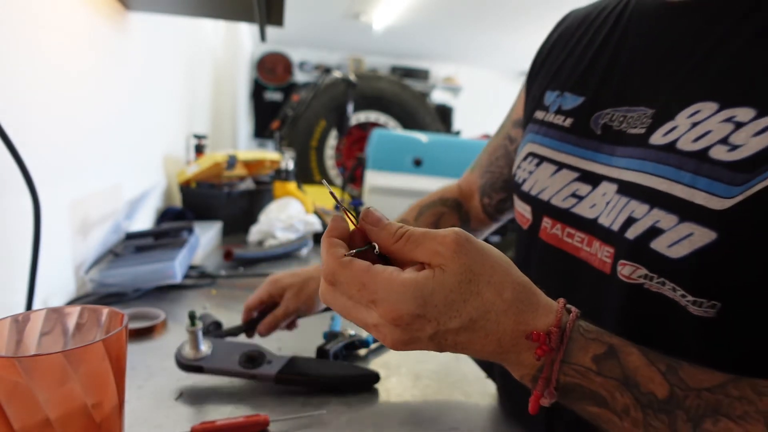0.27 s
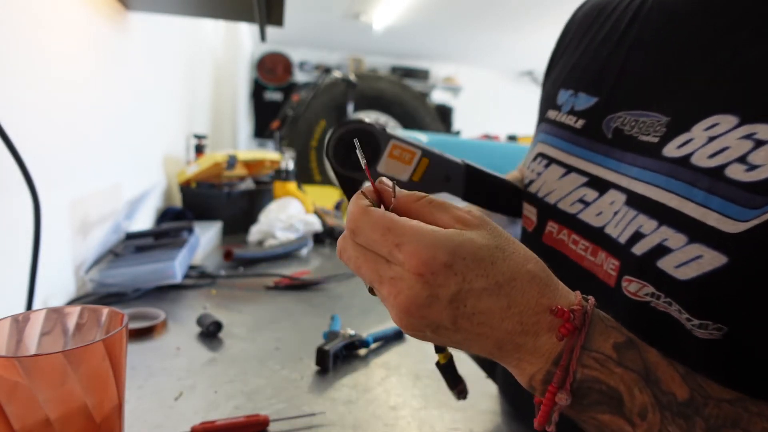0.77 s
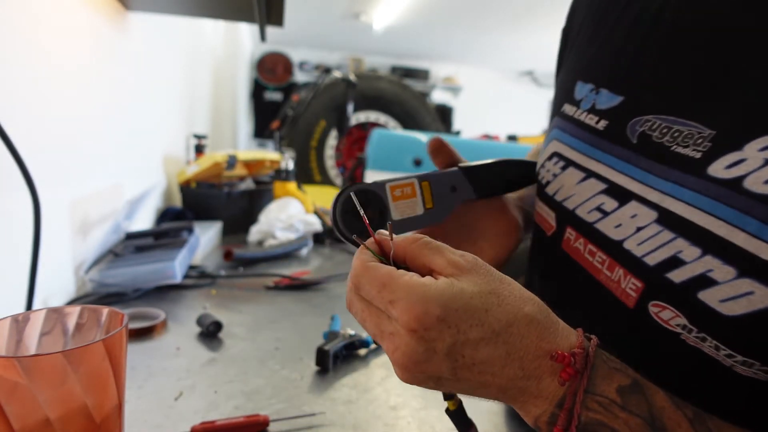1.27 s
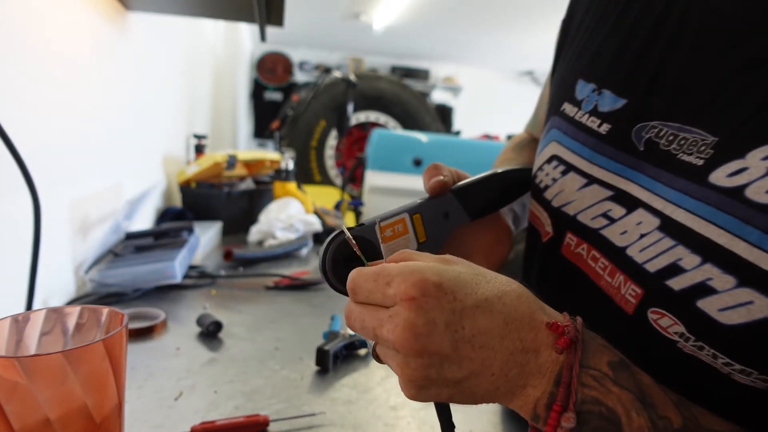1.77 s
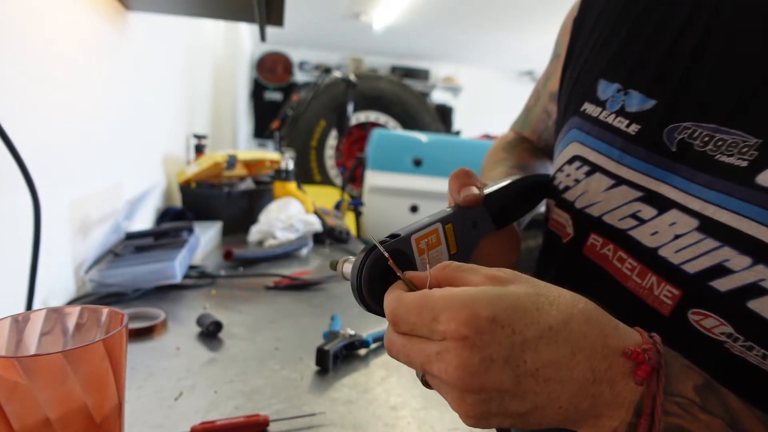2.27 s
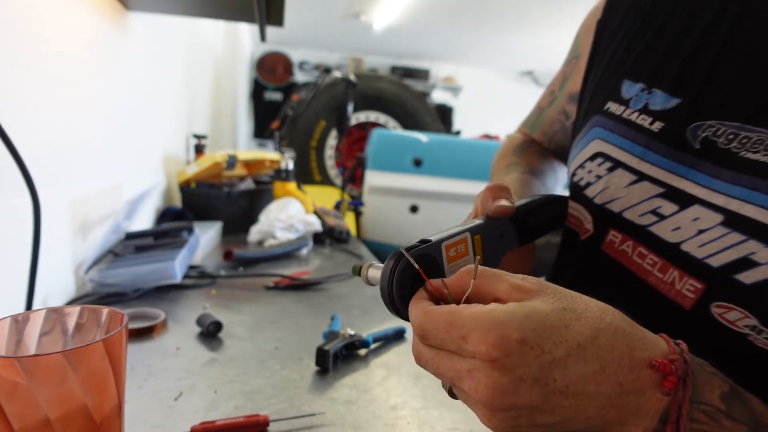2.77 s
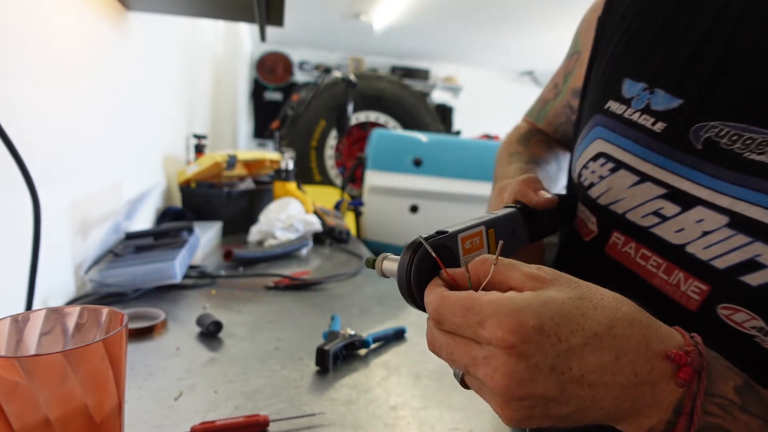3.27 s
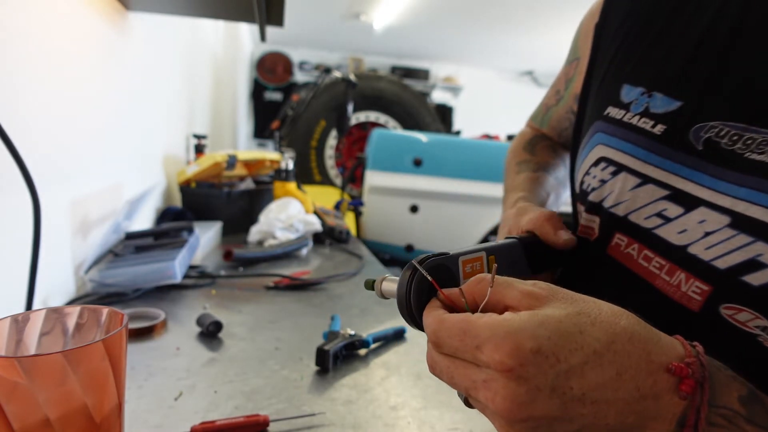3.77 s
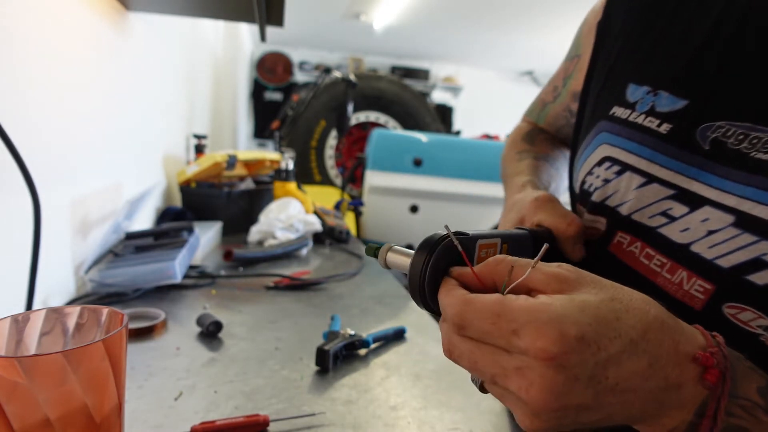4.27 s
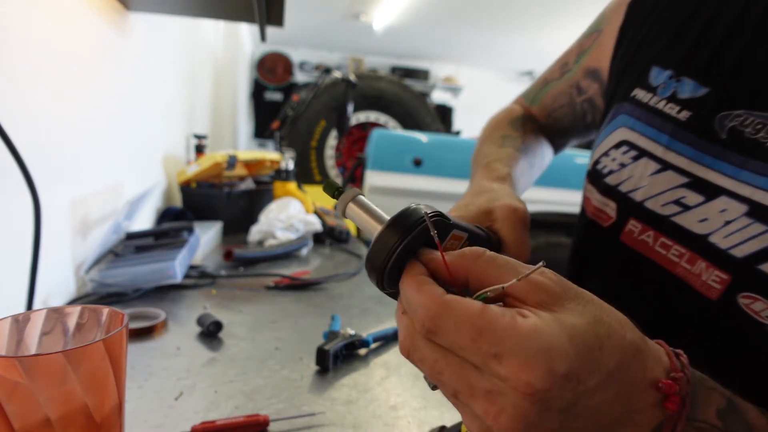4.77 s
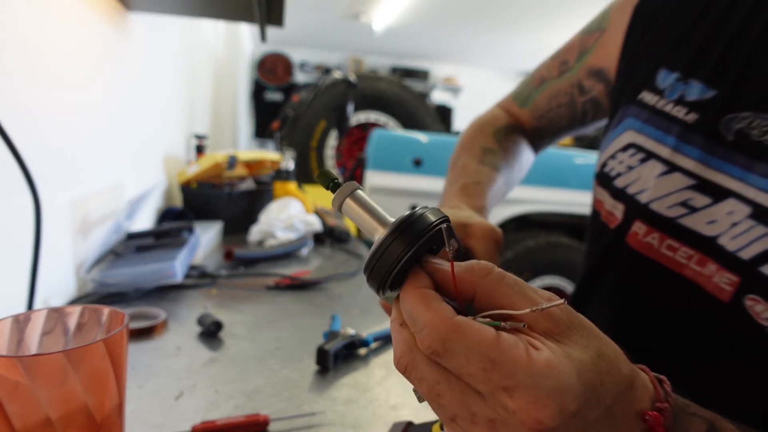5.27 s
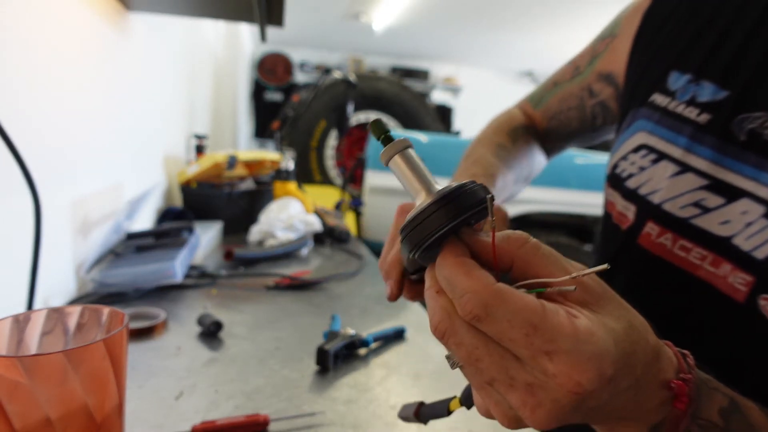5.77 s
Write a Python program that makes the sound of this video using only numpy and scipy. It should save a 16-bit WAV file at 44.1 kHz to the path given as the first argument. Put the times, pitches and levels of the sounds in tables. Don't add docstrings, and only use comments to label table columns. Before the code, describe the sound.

In a quiet garage, a metal hand tool rattles off a steel bench, a catch snaps, sharp ratchet clicks quicken, and jaws spring open with a clatter.

```python
import sys
import numpy as np
from scipy import signal
from scipy.fft import rfft, irfft
from scipy.io import wavfile
from scipy.ndimage import uniform_filter1d

SR = 44100
rng = np.random.default_rng(int(sys.argv[2]) if len(sys.argv) > 2 else 0)


def persist_wave(psi):
    counts = np.round(np.clip(psi, -1, 1) * 32767).astype(np.int16)
    wavfile.write(sys.argv[1], SR, np.atleast_2d(counts).T)


def gain_from_db(level_db):
    decades = np.asarray(level_db, float) / 20
    return 10 ** decades


N = 265923


def unit(x):
    return x / np.sqrt(np.mean(x ** 2) + 1e-20)


def along(points, hz):
    f, v = np.transpose(points)
    return np.interp(np.log(hz + 1), np.log(f + 1), v)


def resonance(modes, f, damping):
    total = 0
    for k, (centre, width_hz, db) in enumerate(modes):
        loss = 1j * f * width_hz * damping
        total = total + (-1) ** k * gain_from_db(db) * loss / (centre * centre - f * f + loss)
    return total


def causal(gain):
    cepstrum = irfft(np.log(gain + 1e-6))
    cepstrum[1:len(gain) - 1] *= 2
    cepstrum[len(gain):] = 0
    return np.exp(rfft(cepstrum))


def rush(spectrum, alike, patchy_db):
    z = signal.stft(rng.standard_normal((2, N + 512)), nperseg=512)[2]
    patches = uniform_filter1d(rng.standard_normal(z.shape[1:]), size=6, axis=0)
    patches = uniform_filter1d(patches, size=12, axis=1)
    pair = signal.istft(z * gain_from_db(patchy_db * unit(patches)), nperseg=512)[1][:, :N]
    hz = np.fft.rfftfreq(N, 1 / SR)
    turn = np.arccos(np.clip(along(alike, hz), -1, 1)) / 2
    mid, side = irfft(rfft(pair) * gain_from_db(along(spectrum, hz)) * [np.cos(turn), np.sin(turn)], N)
    return unit(np.array([mid + side, mid - side]))


def stroke(rows):
    t = np.arange(N) / SR
    return sum(gain_from_db(db - 30 * np.maximum((s - t) / rise, (t - s) / fall)) for s, db, rise, fall in rows)


def scrape(strokes, modes, damping, grit_db):
    grit = gain_from_db(grit_db * unit(uniform_filter1d(rng.standard_normal(N), size=200)))
    noise = rng.standard_normal(N) + 0.37 * rng.standard_normal((2, N))
    ringing = resonance(modes, np.fft.rfftfreq(N, 1 / SR), damping)
    return stroke(strokes) * unit(irfft(rfft(grit * noise) * ringing, N))


def ring_on(blows, modes):
    out, t = np.zeros(N + SR), np.arange(SR // 4) / SR
    beat_hz = 44.7
    lucks = rng.standard_normal((len(blows), len(modes), 2))
    for (s, db), luck in zip(blows, lucks):
        ring = 0
        for (hz, mode_db, t60), (a, b) in zip(modes, luck):
            twin = 0.25 * np.sin(2 * np.pi * (hz + beat_hz) * t + b)
            ring = ring + gain_from_db(mode_db + 1.2 * a - 60 * t / t60) * (np.sin(2 * np.pi * hz * t) + twin)
        out[round(s * SR):][:len(t)] += gain_from_db(db) * ring * np.cos(2 * np.pi * t)
    return out[:N]


def garage(x):
    # (f/Hz, t60/s)
    fading = [(300, 0.97), (2000, 0.4), (5000, 0.4), (9000, 0.29), (15000, 0.16)]
    hz, t, z = signal.stft(rng.standard_normal((2, SR // 3)), SR, nperseg=256)
    tail = signal.istft(z * gain_from_db(-60 * t / along(fading, hz)[:, None]), SR, nperseg=256)[1]
    tail = tail * (1 - np.exp(-np.arange(tail.shape[1]) / SR / 0.001))
    tail = tail + 0.29 * tail[::-1]
    return signal.fftconvolve(x, tail / np.linalg.norm(tail[0]), axes=1)


def contacts(events, modes, chatter, edge_db, damping, wash_db, favour_db, snap, pan_db, side_db, wet_db,
             alike=0, echo_db=-6):
    # (delay/s, level/dB)
    reflections = [(0.0027, -7.5), (0.0052, -6), (0.0093, -23), (0.0125, -13), (0.0165, -23),
                   (0.021, -21.5)]
    # (f/Hz, side level/dB)
    side_tone = [(1000, -3.5), (2500, -5), (5000, -0.5), (12000, 1.5)]
    out, t = np.zeros((2, N + SR)), np.arange(4096) / SR
    f = np.fft.rfftfreq(len(t), 1 / SR)
    small = 1j * f / (0.73 * modes[0][0])
    radiate = (small * small / (1 + 0.88 * small + small * small)) ** 2
    power = sum(np.abs(resonance([m], f, damping=0.96)) ** 2 for m in modes)
    wash = gain_from_db(wash_db) * np.sqrt(power)
    echoes = 1
    for k, (delay, db) in enumerate(reflections):
        sides = [[1], [1.8 * (-1) ** k]]
        echoes = echoes + gain_from_db(db + echo_db) * np.exp(-2j * np.pi * f * delay) * sides
    echoes[1] *= causal(gain_from_db(along(side_tone, f)))
    habit = None
    for s, db, favoured_hz, tilt_db in events:
        luck = rng.standard_normal((len(modes), 2))
        shifted = [(c * (1 + .004 * a), w, mode_db + 2.3 * b) for (c, w, mode_db), (a, b) in zip(modes, luck)]
        rings = resonance(shifted, f, damping)

        blows = rng.standard_normal((4, len(t)))
        habit = blows if habit is None else habit
        share = np.clip(alike, 0, 1) * (habit is not blows)
        blows = share * habit + np.sqrt(1 - share ** 2) * blows
        dying = np.exp(-(t / max(chatter, 3e-4)) ** 1.6)
        blows = blows * np.abs(blows) ** .3 * dying * gain_from_db([[0], [side_db], [0], [side_db]])
        blows[::2, :3] = snap * np.array([3.5, 6.5, 3.5])

        favoured = 1 + resonance([(favoured_hz, 0.098 * favoured_hz, favour_db)], f, damping=0.79)
        low_db, high_db = edge_db - tilt_db / 2, edge_db + tilt_db / 2
        tone = along([(1400, low_db), (4200, 0.0042), (5500, 0.011), (9000, high_db)], f)
        colour = radiate * favoured * causal(gain_from_db(tone))
        z = rfft(blows)
        struck = (z[:2] * rings + z[2:] * causal(wash)) * colour * echoes
        mid, side = irfft(struck, len(t)) * (t < .08)
        click = gain_from_db([[pan_db / 2], [-pan_db / 2]]) * np.array([mid + side, mid - side])
        click *= gain_from_db(db + 1.5) / np.abs(mid).max()

        spread = irfft(causal(np.hypot(np.abs(rings), wash)) * colour / np.sqrt(favoured), len(t))
        wet = gain_from_db(wet_db) * garage(spread[None] * np.linalg.norm(click[0]) / np.linalg.norm(spread))
        wet[:, :len(t)] += click
        out[:, round(s * SR):][:, :wet.shape[1]] += wet
    return out[:, :N]


def room_air():
    # (f/Hz, likeness)
    likeness = [(25, 0.84), (60, 1), (130, 0.94), (290, 0.27), (700, 0.24), (1500, 0.22), (4000, .3),
                (12000, 0.2)]
    # (f/Hz, level/dB per Hz)
    hiss = [(180, -29.5), (300, -15.5), (842, -5.5), (946, -9), (1210, -7.5), (1460, -13), (1750, -14),
            (2400, -22), (2840, -20.5), (4160, -26), (14700, -35.5), (16000, -23)]
    # (f/Hz, level/dB per Hz)
    machine = [(13, -48), (22, -35), (48, -0.5), (76, -12), (81, -22.5), (92, -4.5), (108, -1), (120, 2),
               (139, -11.5), (180, -2), (314, -12), (346, -20.5), (400, -18), (520, -40.5), (880, -120)]
    # (f/Hz, width/Hz, level over the rumble/dB)
    hum_mode = (150, 5, 2)
    # (t/s, level/dB, build-up/s, let-go/s)
    sleeve = [
        (1.1, -59.5, 1.6, 2.2),
        (3.48, -64.5, 0.25, .7),
        (6.03, -53.5, 0.54, .1),
    ]
    # (t/s, level/dB, build-up/s, let-go/s)
    shudder = [
        (0.27, -52.5, 0.5, 0.52),
    ]
    air_db, rumble_db = -60.5, -65.5
    rumble = rush(machine, likeness, patchy_db=2.54)
    hum = 1 + np.abs(resonance([hum_mode], np.fft.rfftfreq(N, 1 / SR), damping=0.81))
    rumble = unit(irfft(rfft(rumble) * hum, N))
    air = np.hypot(gain_from_db(air_db), stroke(sleeve)) * rush(hiss, likeness, patchy_db=1.9)
    return air + np.hypot(gain_from_db(rumble_db), stroke(shudder)) * rumble


def bench():
    # (f/Hz, width/Hz, level/dB)
    top_modes = [(115.6, 21, -9.5), (134.6, 43, 6), (188.5, 61, 4.5), (250, 87, 3.5), (407, 110, 0.5),
                 (617, 76, -2)]
    # (t/s, level/dB)
    thumps = [
        (0.155, -35),
        (0.357, -46),
    ]
    out, t = np.zeros(N), np.arange(SR // 2) / SR
    boom = sum(gain_from_db(db) * np.exp(-np.pi * .3 * w * t) * np.sin(2 * np.pi * hz * t) for hz, w, db in top_modes)
    boom *= 1 - np.exp(-t / 0.0031)
    for s, db in thumps:
        out[round(s * SR):][:len(t)] += gain_from_db(db - 7.5) * boom
    return out


def hands():
    # (t/s of most pressure, level/dB, build-up/s, let-go/s)
    rubs = [(0.22, -59.5, 0.089, 0.088), (0.8, -64, 1, .5), (1.46, -53.5, 0.97, 0.6), (2.0, -76, 0.54, .6),
            (3.4, -68, 0.15, 0.29), (3.78, -63.5, 0.66, 0.37), (5.92, -49, 0.21, 0.08),
            (6.03, -66, 0.091, .1)]
    # (f/Hz, level/dB per Hz)
    skin = [(710, -52), (1200, -10), (1790, -1), (2120, -4.5), (2850, -3), (5100, -8), (5610, -13.5),
            (15000, -38.5)]
    grit = unit(gain_from_db(1.7 * unit(uniform_filter1d(rng.standard_normal(N), size=160))))
    return stroke(rubs) * grit * rush(skin, [(1500, 0.45), (9000, 0.38)], patchy_db=2.5)


def wire():
    # (t/s, level/dB, build-up/s, let-go/s)
    drag = [
        (1.62, -65, .6, 0.28),
    ]
    # (f/Hz, width/Hz, level/dB)
    wire_modes = [(1860, 93, 3), (2890, 20, 13), (4050, 86, -6.5), (4450, 200, -15), (5670, 37, -14)]
    return scrape(drag, wire_modes, damping=0.53, grit_db=4.5)


def squeak():
    # (t/s, f/Hz, level/dB)
    glide = [(.354, 1820, -62), (.359, 1866, -44), (.3635, 1824, -60), (.366, 1700, -44),
             (0.3695, 2160, -47), (.377, 2310, -44.5), (.383, 2200, -52), (0.389, 2200, -66)]
    s, hz, db = np.transpose(glide)
    t = np.arange(N) / SR
    turn = 2 * np.pi * np.cumsum(np.interp(t, s, hz)) / SR
    rough = 1 + .6 * unit(uniform_filter1d(rng.standard_normal(N), size=90))
    gain = gain_from_db(np.interp(t, s, db, left=-120, right=-120))
    return gain * rough * (np.sin(turn) + .3 * np.sin(2 * turn))


def lift():
    # (t/s, peak/dB, favoured f/Hz, tilt/dB)
    ticks = [(0.1531, -39, 1450, -8.5), (0.218, -58, 5100, -7), (0.2586, -47.5, 4050, -3),
             (0.2826, -43.5, 2870, 0), (0.2914, -47.5, 4050, 7), (0.357, -55, 1950, 9.5),
             (0.3678, -42.5, 2120, 7.5), (0.3738, -56, 2260, 0.5)]
    # (f/Hz, width/Hz, level/dB)
    slider = [(750, 71, -5), (1244, 1800, -5), (2200, 120, 0.5), (2970, 270, -6), (3750, 84, -1.5),
              (4200, 350, -5.5), (5394, 620, -6.5), (7400, 510, -13.5), (10980, 2200, -58)]
    return contacts(ticks, slider, 0.018, edge_db=2.0, damping=0.87, wash_db=-4.5, favour_db=9.0, snap=0.37,
                    pan_db=4.0, side_db=-8, wet_db=-7.5)


def loose_parts():
    # (t/s, peak/dB, favoured f/Hz, tilt/dB)
    knocks = [(0.578, -41.5, 2330, -12), (0.5942, -26, 4700, 0), (0.5975, -31.5, 4600, -3),
              (0.6075, -31.5, 4340, -6), (0.6155, -33, 5200, -1.5), (0.62, -23, 5000, -4),
              (0.623, -26, 3330, -14), (0.63, -38.5, 3400, -10)]
    # (t/s, peak/dB, favoured f/Hz, tilt/dB)
    rattle = [(0.7983, -13, 4900, 5.5), (0.8023, -24, 5000, -20), (0.9324, -34, 3120, -9),
              (0.937, -32.5, 3000, -3), (0.9941, -25.5, 3160, -24), (0.9988, -18.5, 6450, -8),
              (1.004, -31, 3360, -4), (1.0843, -24, 3600, -6), (1.29, -43, 2180, -28),
              (1.3887, -32.5, 3220, -27), (1.4228, -30, 3300, -11)]
    # (f/Hz, width/Hz, level/dB)
    loose = [(1260, 120, -12.5), (1620, 40, -12.5), (2040, 66, -4), (2320, 210, -11.5), (2970, 22, -6),
             (2990, 150, -9), (3400, 730, -8.5), (3750, 180, -7.5), (4600, 520, -8), (5110, 25, -9.5),
             (5640, 130, -10.5), (6480, 390, -9), (7890, 200, -7.5), (9340, 1000, -13), (11100, 860, -14),
             (13190, 2000, -41)]
    # (t/s, level/dB, build-up/s, let-go/s)
    skid = [
        (0.994, -29, 0.02, 0.0047),
    ]
    # (t/s, level/dB)
    frame_blows = [
        (0.799, -42.5),
        (0.935, -51),
    ]
    # (f/Hz, level/dB, t60/s)
    frame_modes = [(1980, -19, 0.25), (3076, 0.5, 0.34), (4000, -21, 0.34), (4570, -4, 0.285),
                   (4800, -2.5, 0.25), (5556, -15, .3), (6130, -19, 0.31), (7800, -12, 0.25)]
    # (t/s, level/dB)
    landing_blows = [
        (0.995, -40.5),
    ]
    # (f/Hz, level/dB, t60/s)
    landing_modes = [(1180, -15, 0.11), (2046, -4, 0.21), (3040, -5, 0.26), (4100, -8, .11),
                     (5383, -10, .18), (6277, -13, .3)]
    knocking = contacts(knocks, loose, 0.0047, echo_db=-4, edge_db=-1.0, damping=1.0, wash_db=5, favour_db=2.5,
                        snap=0.75, pan_db=2.5, side_db=-7, wet_db=-12)
    rattling = contacts(rattle, loose, 0.01, echo_db=-5.5, edge_db=-0.5, damping=0.73, wash_db=8.5,
                        favour_db=8.0, snap=1.0, pan_db=1.0, side_db=-7.5, wet_db=-12.0)
    skidding = scrape(skid, loose[:9], damping=0.68, grit_db=-6)
    ringing = ring_on(frame_blows, frame_modes) + ring_on(landing_blows, landing_modes)
    return knocking + rattling + skidding + ringing


def seating():
    # (t/s, peak/dB, favoured f/Hz, tilt/dB)
    pin = [(1.773, -53, 5200, -7), (1.8494, -54, 4450, -7), (1.9245, -52, 3200, -14),
           (1.9838, -54.5, 4900, -4), (2.1297, -50.5, 4400, 7), (2.3064, -37, 910, 2),
           (2.354, -28, 3850, 3), (2.3563, -22.5, 4430, 0.5), (2.36, -31, 6540, 2),
           (2.8612, -54.5, 4500, 21)]
    # (f/Hz, width/Hz, level/dB)
    locator = [(660, 100, -15), (900, 160, -9.5), (1430, 410, -13), (2160, 320, 0), (3000, 230, -5.5),
               (3850, 430, 0), (4547, 120, -1), (5500, 2400, -4.5), (6800, 570, -9), (9270, 980, -10),
               (11760, 2200, -11)]
    # (t/s, level/dB)
    pin_blows = [
        (2.308, -61),
        (2.357, -51),
    ]
    # (f/Hz, level/dB, t60/s)
    locator_tones = [(900, -6, 0.14), (2100, -11, 0.14), (3850, -5, .12), (4550, 1, 0.25),
                     (6880, -10, 0.27)]
    snaps = contacts(pin, locator, 0.0046, echo_db=-6, edge_db=1.0, damping=1.0, wash_db=1.5, favour_db=13.0,
                     snap=0.71, pan_db=0.5, side_db=-5.5, wet_db=-11.0)
    return snaps + ring_on(pin_blows, locator_tones)


def grip():
    # (t/s, peak/dB, favoured f/Hz, tilt/dB)
    taps = [(2.553, -54, 845, 16), (2.6425, -41.5, 1400, -3), (2.707, -43.5, 644, -8),
            (3.294, -48.5, 700, -28), (3.42, -42.5, 600, -30), (3.444, -46, 610, -13)]
    # (f/Hz, width/Hz, level/dB)
    handle = [(600, 91, 7), (805, 92, 4), (1147, 66, 1), (1510, 200, 1), (2010, 310, -3.5),
              (3000, 150, -24)]
    # (t/s, level/dB, build-up/s, let-go/s)
    creaks = [
        (3.3, -67.5, .03, 0.32),
        (3.43, -54.5, 0.27, 0.52),
    ]
    tapping = contacts(taps, handle, 0.016, edge_db=-7.0, damping=0.94, wash_db=-9.0, favour_db=3, snap=0.64,
                       pan_db=1.5, side_db=-8, wet_db=-15.0)
    return tapping + scrape(creaks, handle[:3], damping=0.53, grit_db=-2.0)


def catch():
    # (t/s, peak/dB, favoured f/Hz, tilt/dB)
    snaps = [(3.3674, -60, 2930, -32), (3.4141, -50, 3030, -2), (3.488, -43.5, 2970, -33),
             (3.501, -57, 2470, -10), (3.545, -45, 2120, -40), (3.551, -35, 3150, -13),
             (3.5575, -15.5, 5100, -5.5), (3.5614, -27, 5500, 21), (3.6209, -42.5, 3000, -20)]
    # (f/Hz, width/Hz, level/dB)
    hook = [(1290, 500, -27), (2200, 97, 1), (3000, 260, -4), (3430, 230, -4), (4700, 510, -1),
            (5000, 290, -7), (5350, 150, -8), (5740, 830, -0.5), (7600, 990, -5), (11500, 2100, -1),
            (11400, 2000, -4)]
    return contacts(snaps, hook, 0.0019, echo_db=-0.5, edge_db=-2.5, damping=0.69, wash_db=1.0, favour_db=8.0,
                    snap=1.0, pan_db=2.0, side_db=-3.0, wet_db=-10.0)


def release():
    # (t/s, peak/dB, favoured f/Hz, tilt/dB)
    easing = [(5.7454, -26.5, 2890, 2), (5.811, -53, 2040, 22.5), (5.8381, -50, 2070, 3),
              (5.8642, -49, 2010, 5), (5.8865, -55, 900, 2), (5.89, -37.5, 4200, -4)]
    # (f/Hz, width/Hz, level/dB)
    hinge = [(870, 56, -11), (1140, 240, -10), (2050, 154, -1), (3020, 140, -7.5), (3600, 710, -12),
             (4700, 830, -12), (5500, 640, -11.5), (7220, 1200, -26), (8870, 690, -19.5),
             (12100, 3400, -31.5)]
    # (t/s, level/dB, build-up/s, let-go/s)
    hinge_scrape = [
        (5.9, -46, 0.098, 0.029),
    ]
    # (t/s, peak/dB, favoured f/Hz, tilt/dB)
    jaw_blows = [(5.922, -17, 5500, -1), (5.9255, -14.5, 5500, 2.5), (5.9303, -21.5, 4280, -16),
                 (5.9375, -27, 5500, 6), (6.0107, -20.5, 5040, 3), (6.017, -17.5, 6180, -8.5),
                 (6.0214, -15.5, 6110, -10), (6.0243, -13, 5590, -3.5)]
    # (f/Hz, width/Hz, level/dB)
    jaws = [(865, 31, -14), (2064, 79, -6.5), (3110, 110, -8.5), (3520, 130, 1), (4500, 480, 2.5),
            (5500, 290, -9.5), (5870, 340, -1.5), (7500, 560, -13), (8340, 450, -13), (9300, 1000, -12.5),
            (11270, 600, -11.5), (13250, 900, -33), (15300, 1700, -25.5)]
    ticking = contacts(easing, hinge, 0.0063, edge_db=3.5, damping=1.5, wash_db=7.0, favour_db=15.5, snap=0.43,
                       pan_db=1.2, side_db=-8.0, wet_db=-12.0)
    opening = contacts(jaw_blows, jaws, 0.0085, edge_db=5.0, damping=0.23, wash_db=1.0, favour_db=9.0,
                       snap=0.51, pan_db=1.5, side_db=-8.5, wet_db=-13.0)
    return ticking + scrape(hinge_scrape, hinge, damping=0.99, grit_db=5.5) + opening


def ratchet():
    # (t/s, peak/dB, favoured f/Hz, tilt/dB)
    easy = [
        (4.215, -18.5, 5000, 6),
        (4.3241, -13.5, 5550, 5),
        (4.4418, -41, 5100, -22),
        (4.4486, -11.5, 5000, 8.5),
        (4.5126, -12.5, 4520, 5.5),
        (4.6092, -13.5, 5300, 11.5),
        (4.761, -12, 4500, 5),
    ]
    # (f/Hz, width/Hz, level/dB)
    pawl = [(2200, 120, -7), (2740, 500, -9), (3120, 83, -37), (3600, 750, -5.5), (4050, 210, -22.5),
            (4130, 100, -4.5), (4900, 390, 2.5), (5500, 120, 7), (5530, 770, -2.5), (7650, 670, -17),
            (8240, 340, -1.5), (9550, 1500, -16.5), (11380, 500, -9.5), (14130, 4100, -31.5)]
    # (t/s, peak/dB, favoured f/Hz, tilt/dB)
    loaded = [
        (4.8765, -12.5, 4900, 8),
        (4.9686, -11.5, 4600, 7),
        (5.0458, -11.5, 7560, 2),
        (5.093, -11.5, 7980, 3.5),
        (5.1596, -12.5, 7700, 5),
    ]
    # (t/s, peak/dB, favoured f/Hz, tilt/dB)
    stop = [
        (5.2344, -17.5, 3760, -3),
        (5.237, -21, 8400, -6.5),
    ]
    # (f/Hz, width/Hz, level/dB)
    tense = [(2094, 130, -13), (2910, 330, -10.5), (3160, 100, -40), (3600, 620, -10), (4050, 230, -5),
             (4364, 140, 0.5), (4746, 140, 1.5), (5140, 430, -1.5), (5650, 1360, -7.5), (7980, 190, -5),
             (8255, 180, -4.5), (9500, 680, -23), (11380, 500, -13.5), (14220, 7100, -34)]
    # (f/Hz, level/dB, t60/s)
    spring = [(8300, -2, 0.24), (11450, -11, 0.18)]
    spring_db = -34.5
    first = contacts(easy, pawl, 0.0033, alike=0.5, echo_db=-2.2, edge_db=-1.5, damping=1.0, wash_db=0.0,
                     favour_db=-5.0, snap=0.46, pan_db=2.5, side_db=-6, wet_db=-12.0)
    later = contacts(loaded, tense, 0.0037, alike=0.58, echo_db=-1.9, edge_db=-0.3, damping=1.3, wash_db=-4,
                     favour_db=1.5, snap=0.46, pan_db=2.0, side_db=-8.5, wet_db=-12.0)
    end = contacts(stop, tense, 0.0068, edge_db=9, damping=1.9, wash_db=-1.0, favour_db=11.5, snap=0.517,
                   pan_db=1.7, side_db=-8.0, wet_db=-13.5)
    teeth = [(s, db + spring_db) for s, db, *_ in easy + loaded + stop]
    return first + later + end + ring_on(teeth, spring)


def scene():
    around = room_air() + bench() + hands() + wire()
    handling = squeak() + lift() + loose_parts() + seating() + grip() + catch()
    return around + handling + release() + ratchet()


def roll_off(x):
    return signal.sosfilt(signal.butter(12, 16830, fs=SR, output="sos"), x)


def record(dry):
    # (f/Hz, level/dB)
    mic = [(40, -14), (90, -1), (15500, 0), (15900, -16), (16700, -28)]
    # (f/Hz, level/dB)
    ports = [(200, -0.1), (600, -3), (2000, -1.5), (5000, -1.6), (12000, -0.5)]
    padded = N + 4096
    hz = np.fft.rfftfreq(padded, 1 / SR)
    response = along(mic, hz) + np.outer([.5, -.5], along(ports, hz))
    heard = irfft(rfft(dry, padded) * gain_from_db(response), padded)[:, :N]
    return roll_off(heard)


dry = scene()
out = record(dry)
persist_wave(out)
```